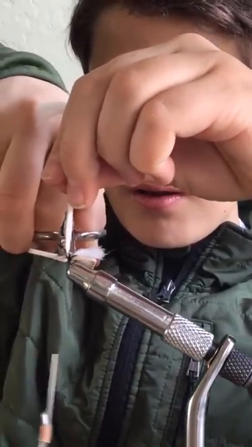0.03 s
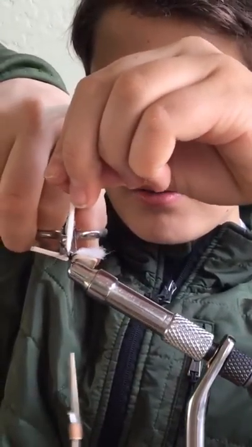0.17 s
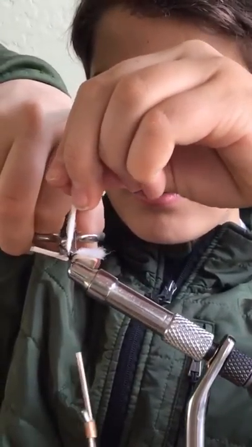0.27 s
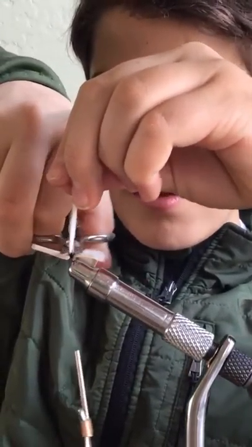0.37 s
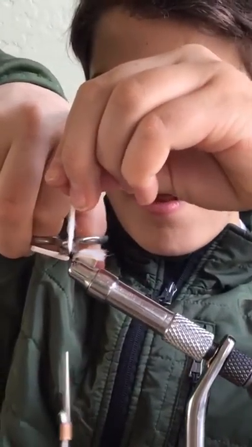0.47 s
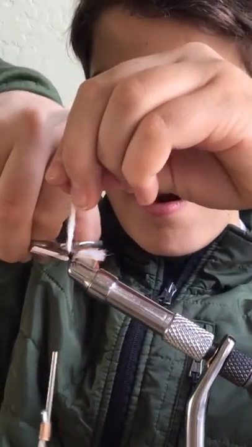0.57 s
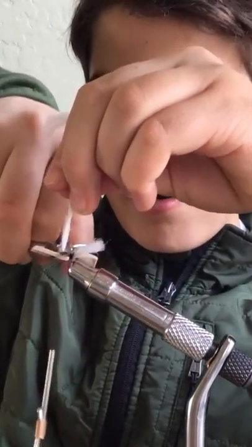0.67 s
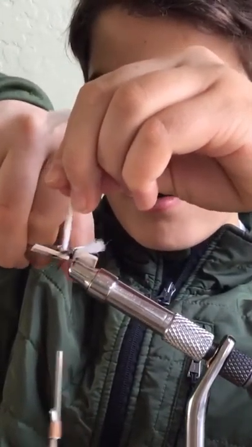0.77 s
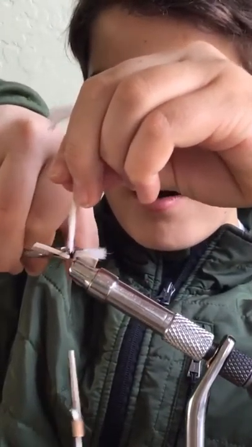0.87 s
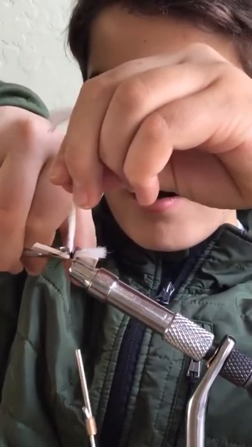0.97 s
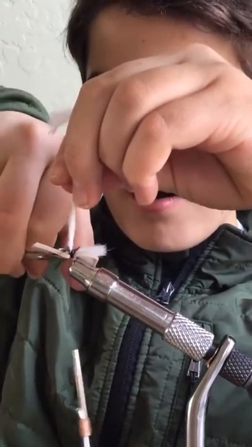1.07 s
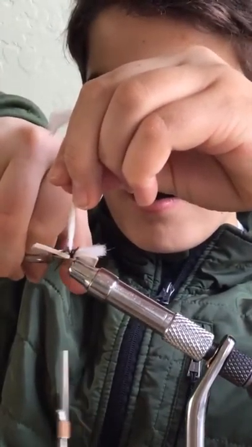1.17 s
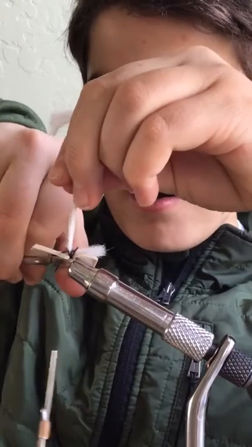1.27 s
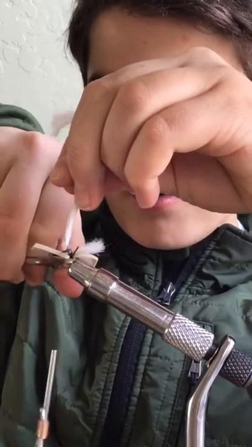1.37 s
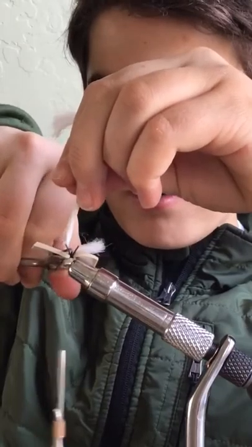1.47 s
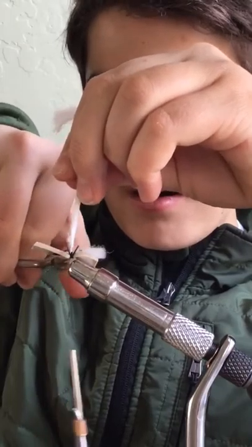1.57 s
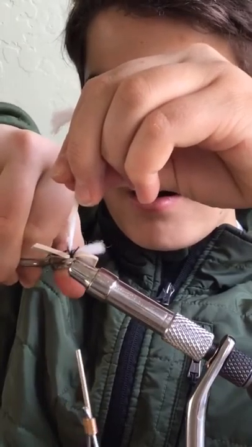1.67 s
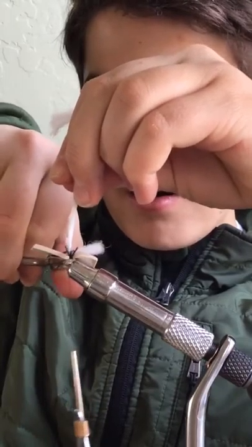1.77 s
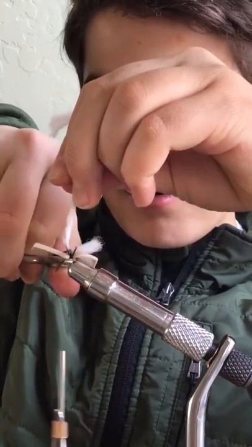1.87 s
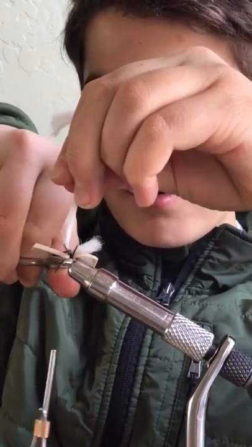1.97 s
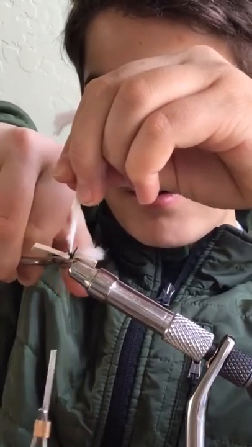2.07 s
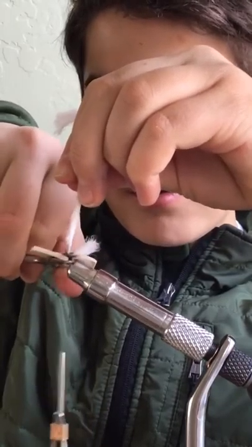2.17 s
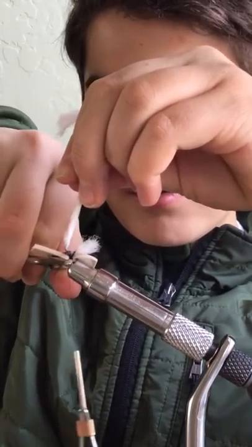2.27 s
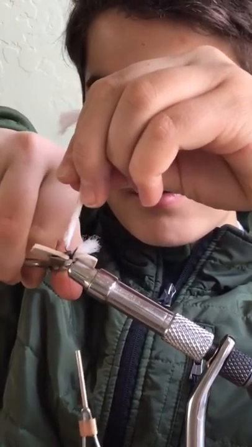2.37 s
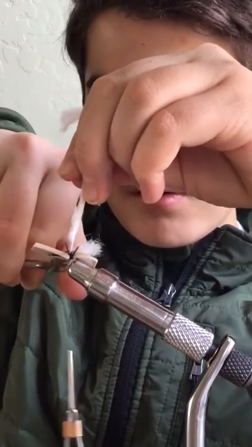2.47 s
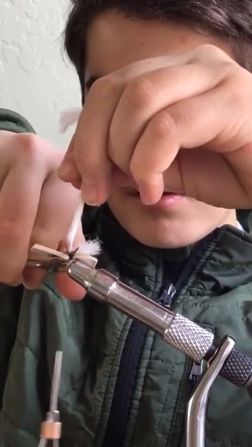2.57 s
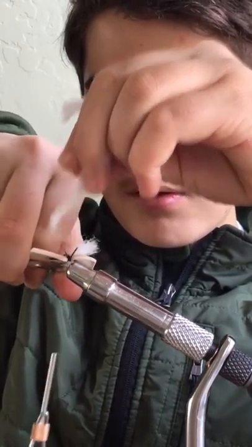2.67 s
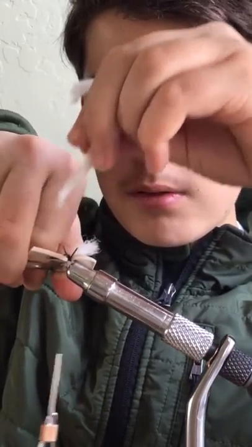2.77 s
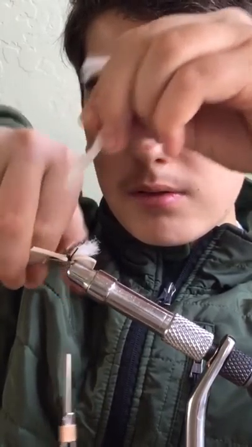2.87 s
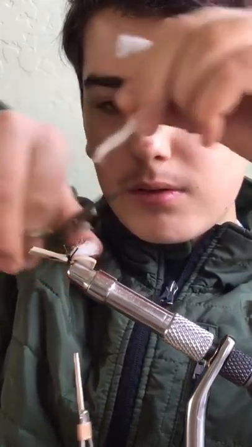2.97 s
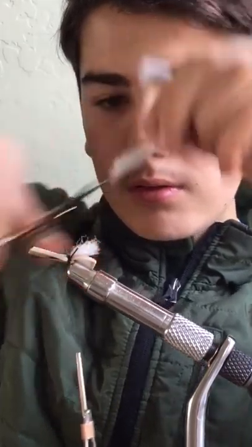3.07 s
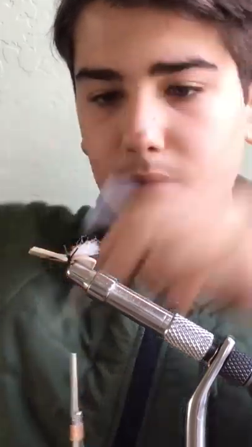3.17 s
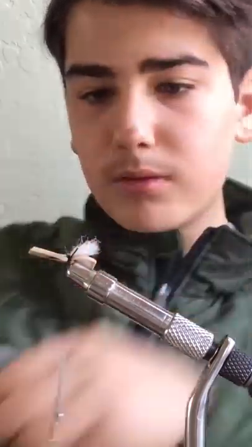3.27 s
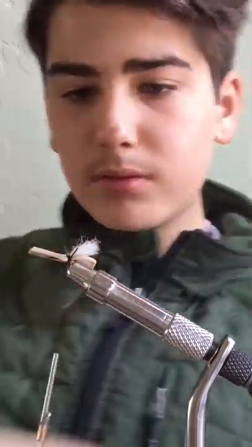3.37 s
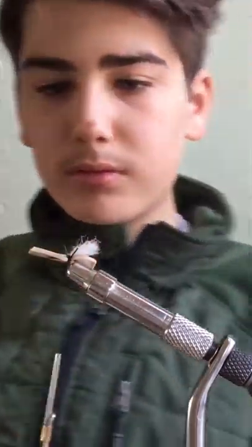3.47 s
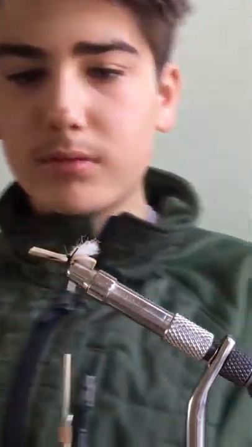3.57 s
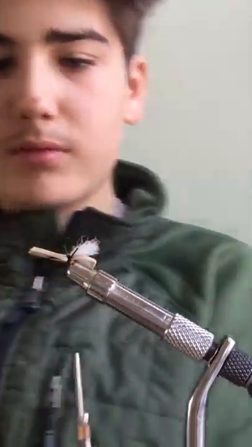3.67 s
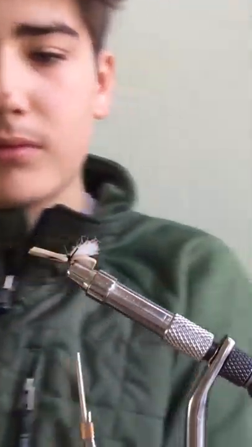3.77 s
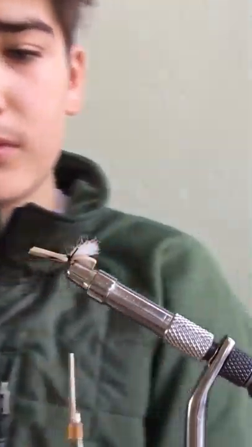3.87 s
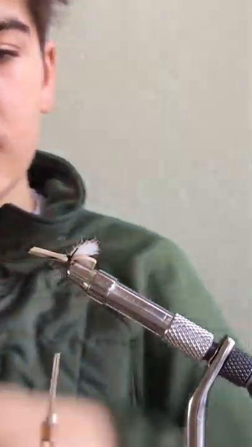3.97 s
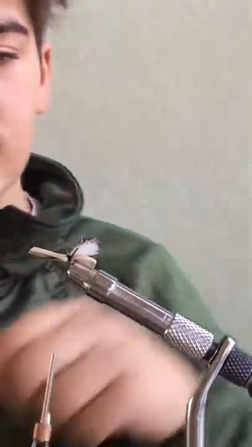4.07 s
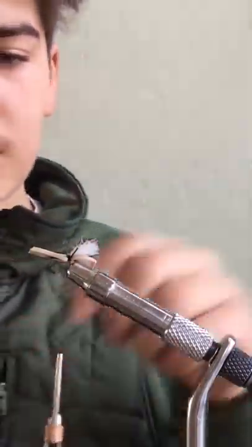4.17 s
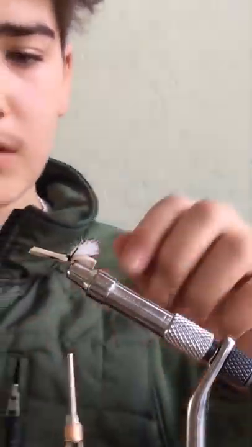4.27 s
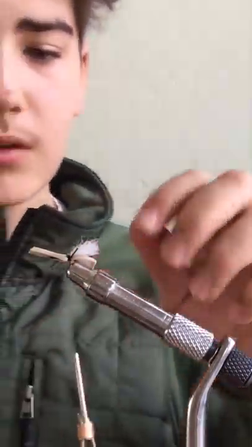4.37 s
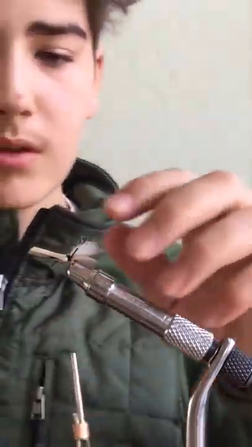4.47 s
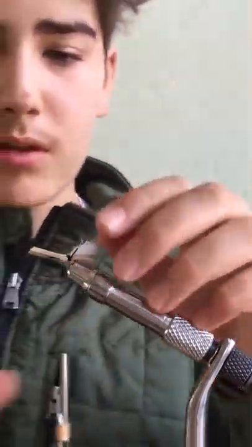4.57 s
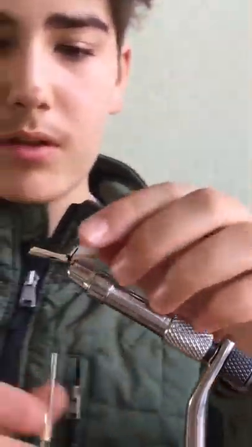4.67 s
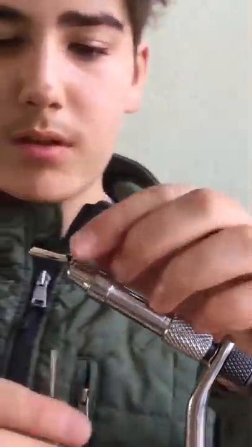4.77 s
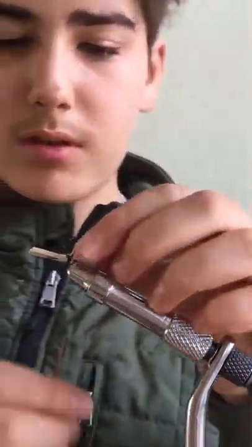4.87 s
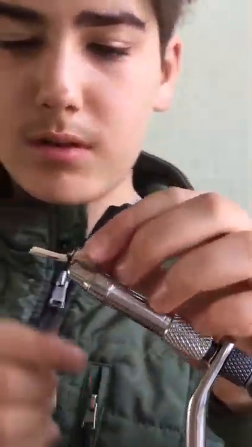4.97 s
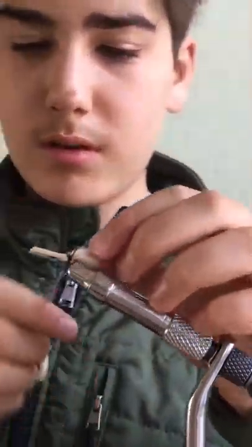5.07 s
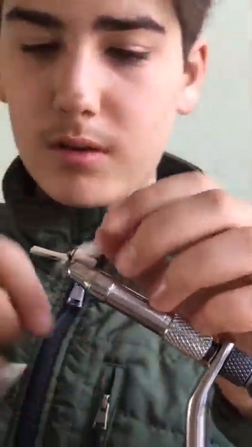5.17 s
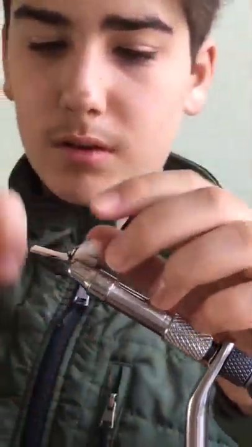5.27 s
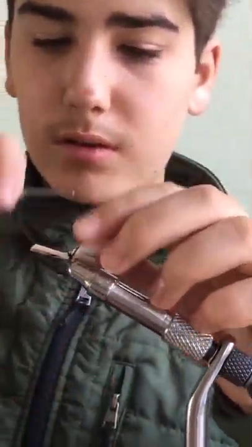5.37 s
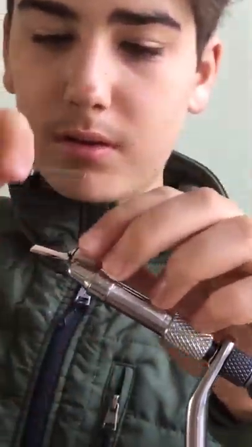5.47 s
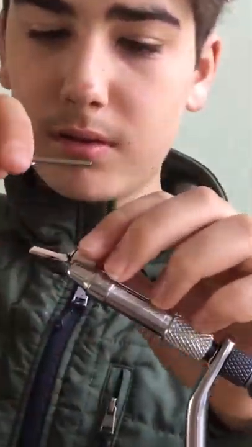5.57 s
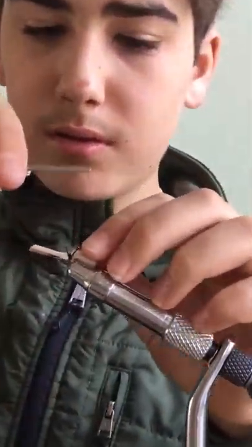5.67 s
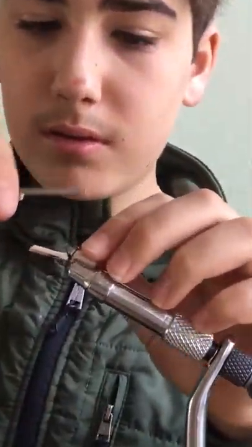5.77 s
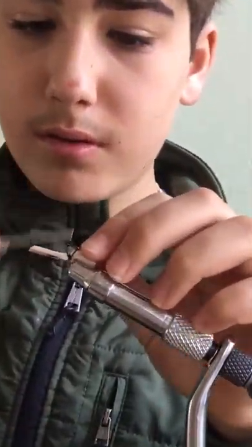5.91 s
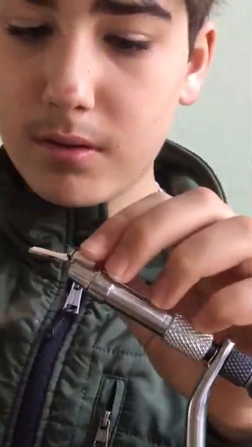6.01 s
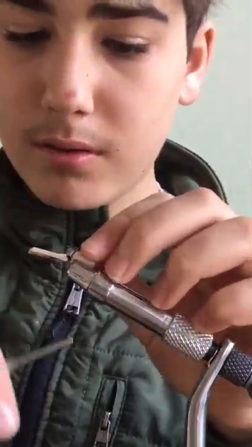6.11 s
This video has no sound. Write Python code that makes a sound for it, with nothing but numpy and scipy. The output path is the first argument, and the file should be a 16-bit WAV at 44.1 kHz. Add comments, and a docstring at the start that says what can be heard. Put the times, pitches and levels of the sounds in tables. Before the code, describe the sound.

Close up in a small quiet room, fine scissors tick, rub and snip four times through fibres, while tugs on a small vise give soft dull thuds with a low room boom. After a sharp final cut, a hand bumps the table, the scissors knock loudly and clatter with a short scrape, nylon sleeves brush, and only low room tone remains.

```python
"""Steel scissors snip and tick at a fly-tying vise; then they knock, slide and clatter on the table top.
Blades and rubs are short bursts of coloured micro-impacts; fibres crunch as random grains.
Each tug rings the modes of the vise, and the small room answers with a low boom a moment later.
Knocks ring wood, room and loose steel; jacket sleeves brush as swelling grains over a low room tone.
All is heard close up by a phone in a small room, with the table wetter than the scissors and vise."""
import sys
import numpy as np
from scipy import signal
from scipy.fft import rfft, irfft
from scipy.io import wavfile

SR = 44100
rng = np.random.default_rng(int(sys.argv[2]) if len(sys.argv) > 2 else 0)


def waveform_to_disk(signal):
    """Save audio, clipped to [-1, 1], as 16-bit WAV at the path in sys.argv[1]."""
    frames = np.transpose(np.atleast_2d(signal))
    scaled = np.clip(frames, -1, 1) * 32767
    samples = np.round(scaled).astype(np.int16)
    wavfile.write(sys.argv[1], SR, samples)


N = 270857
TIME = np.arange(N) / SR  # s, whole scene
AGE = TIME[:SR * 3 // 4]  # s, one response


def undb(db):
    """Decibels to gain."""
    return 10 ** (np.asarray(db) / 20)


def fade(t60):
    """Exponential decay that falls 60 dB in t60 seconds."""
    return np.exp(-np.log(1000) * AGE / t60)


def swell(s, attack, hold, release):
    """Envelope that climbs 60 dB in the attack to reach 1 at time s, holds, and falls 60 dB in the release."""
    before = np.maximum(s - TIME, 0) / attack
    after = np.maximum(TIME - s - hold, 0) / release
    return np.exp(-np.log(1000) * np.minimum(before + after, 10))


def unit(x):
    """Scale a response to unit energy."""
    return x / np.sqrt(np.sum(x ** 2))


def through(x, response):
    """Pass a sound through a response."""
    return signal.fftconvolve(x, response)[:len(x)]


def add(out, s, x):
    """Mix x in at time s."""
    i = int(max(s, 0) * SR)
    out[i:i + len(x)] += x[:N - i]


def colour(points, tilt_db=0, size=4096):
    """Causal response with the given spectrum and tilt per octave, from the cepstrum of its log gain."""
    hz, db = np.transpose(points)
    octave = np.log2(np.maximum(np.arange(size // 2 + 1) * SR / size, 1))
    gain_db = np.interp(octave, np.log2(hz), db) + tilt_db * octave
    cepstrum = irfft(np.log(undb(gain_db)))
    # keeping only the positive times makes the response causal
    cepstrum[0], cepstrum[size // 2:] = 0, 0
    return unit(irfft(np.exp(2 * rfft(cepstrum[:size]))))


def ring(modes):
    """Sum of decaying sine modes, each given as Hz, dB and t60 in seconds."""
    return sum(undb(db) * fade(t60) * np.sin(2 * np.pi * hz * AGE) for hz, db, t60 in modes)


def contact(t60, rise=0.0023):
    """A quickly dying chatter of micro-impacts: random signs under a short rise and a decay."""
    return rng.choice([-1, 1], len(AGE)) * fade(t60) * (1 - fade(rise))


def grains(rate, spread_db):
    """Random tiny slips of very unequal size, rate per second, rms 1."""
    happens = rng.random(N) < rate / SR
    sign = rng.choice([-1, 1], N)
    size = undb(spread_db * np.minimum(rng.exponential(size=N), np.pi))
    slips = happens * sign * size
    return slips / slips.std()


def room_tone(level_db=-66.5, waver_db=5.5):
    """Low background of the house: steady coloured noise and a drone of two standing waves that wavers."""
    # Spectrum of the steady rumble. Each row: frequency in Hz, density in dB per Hz.
    rumble_colour = [(25, -23), (60, 1.5), (100, -2.5), (128, 0), (185, -5), (250, -1.5), (320, -10),
                     (550, -21.5), (1250, -34.5), (2000, -33), (2800, -35), (4800, -35), (9000, -39.5),
                     (16000, -44)]
    waver = signal.resample(rng.standard_normal(60), N)
    rumble = through(rng.standard_normal(N), colour(rumble_colour))
    drone = through(rng.standard_normal(N), unit(ring([(136.5, 0.0, 0.5), (246.0, 0, 0.067)])))
    return undb(level_db) * (rumble + undb(-11.5 + waver_db * waver) * drone)


def room(x, near_db, tail_db):
    """Scatter from near things, a flutter between the walls and a short, duller tail."""
    # Sound bounces between two walls. Each row: delay in seconds, level in dB.
    echoes = [(0.0364, -28), (0.0445, -29), (.081, -43.5), (.085, -36.5)]
    near, tail = rng.standard_normal((2, len(AGE))) * (1 - fade(0.027))
    near_colour = colour([(150, -15.5), (500, 3.0), (16000, 5)])
    tail_colour = colour([(120, 6.5), (400, 4), (4000, -4.5), (8000, -7.5), (16000, -22.0)])
    near = unit(through(near * fade(0.074), near_colour))
    tail = unit(through(tail * fade(0.23), tail_colour))
    wet = through(x, undb(near_db) * near + undb(tail_db) * tail)
    # furniture smears and dulls each wall echo
    wall_colour = colour([(100, -6.0), (4000, -2), (8000, -7), (16000, -17.0)])
    wall = unit(through(contact(t60=0.034), wall_colour))
    bounce = through(x, wall)
    for s, db in echoes:
        add(wet, s, undb(db) * bounce)
    return x + wet


def jacket():
    """Nylon sleeves brush in fine grains, swelling and dying away with the speed of the arm; some strokes hiss."""
    # A sleeve brushes with each move of an arm; the row at 3.67 s is instead the rattle after the hand bumps
    # the table. # Each row: fastest moment in seconds, level in dB, time to swell or die away in seconds, #
    # fine hiss in dB relative to the stroke.
    strokes = [(3.1, -82, 0.08, -8), (3.351, -69.5, 0.091, -10), (3.67, -66, 0.069, -25),
               (3.86, -63, 0.044, -23), (4.3, -66, 0.16, -25), (4.54, -66.5, .07, -20),
               (5.07, -75.5, .12, -8.5), (5.65, -80.5, 0.12, -15)]
    # Spectra of the cloth and of its fine hiss. Each row: frequency in Hz, density in dB per Hz.
    cloth_colour = [(100, -11), (350, 6), (700, 6), (1200, -4.5), (2000, 1), (3200, -6), (5000, -7),
                    (7000, -18), (15000, -33)]
    hiss_colour = [(2000, -12.5), (5000, -0.5), (8000, -2.5), (16000, -13)]
    fibres = grains(rate=45000, spread_db=3.0)
    body, hiss = 0, 0
    for s, db, swell_s, hiss_db in strokes:
        speed = undb(db) / np.cosh(np.clip((TIME - s) / swell_s, -20, 20))
        # overlapping strokes add in power
        body = np.hypot(body, speed)
        hiss = np.hypot(hiss, undb(hiss_db) * speed)
    return through(body * fibres, colour(cloth_colour)) + through(hiss * fibres, colour(hiss_colour))


def table(knock_ring_db=-7, slide_steel_db=-19):
    """Bumps thud on the table top; knocks and a stick-slip slide also ring wood, room and the loose blades."""
    # Resonances heard with a knock, of wood and room together, and of the blades.
    # Each row: frequency in Hz, level in dB, t60 in seconds.
    knock_modes = [(128, -5, .35), (251, -5, .22), (360, -7, .18), (440, -8, .18), (635, 0, .22),
                   (692, 0, .22), (746, -2, .16), (801, 0, .15), (837, 8, .19), (1500, -3, .12),
                   (1725, -3, .15), (1800, -1, .12), (1942, -2, .15), (2077, -1, .15), (2167, -2, .15),
                   (2276, 0, .14), (2715, -4, .11), (3020, 2, .11), (3275, -4, .11)]
    steel_modes = [(11767, 0, .09), (11885, -3, .02), (12584, 0, .02), (12694, 2, .055), (15337, -2, .04),
                   (15680, -2, .04)]
    # The scissors clatter down. Each row: start in seconds, level in dB, t60 of the contact in seconds,
    # steel ring in dB, treble tilt in dB per octave.
    knocks = [(3.8957, -32.5, 0.067, -16.5, -1), (3.9204, -23, 0.047, -25, 0.2),
              (3.945, -32.5, 0.03, -15.5, 3), (4.097, -12.5, 0.035, -15.5, -1),
              (4.137, -24.5, 0.07, -24, -2.5), (4.153, -23, 0.044, -31.5, 2.5),
              (4.186, -33.5, 0.027, -33, 1)]
    # A hand bumps the table. Each row: start in seconds, level in dB, t60 of the contact in seconds.
    bumps = [(3.5932, -32.5, 0.052), (3.609, -37, 0.02), (3.627, -37, 0.039), (3.653, -51.5, 0.1),
             (3.677, -50, 0.19), (4.34, -54.5, 0.093)]
    # Steel slides over the table between knocks. Each row: start in seconds, length in seconds, level in dB.
    slides = [(3.911, .18, -48.5), (4.125, 0.044, -39.5)]
    # Spectra of knocks and bumps. Each row: frequency in Hz, density in dB per Hz.
    knock_colour = [(30, -60), (80, -37), (150, -12), (520, -14), (650, 0), (830, 4.5), (1060, -9.5),
                    (1500, -1), (2100, 0.5), (3100, -7), (4500, -10.5), (6500, -25.5), (10000, -32.5),
                    (16000, -35)]
    bump_colour = [(50, -1.5), (150, 4.5), (380, 7), (700, 6), (1100, -15), (1700, 1), (2600, 4),
                   (3200, -3), (4200, -5.5), (6000, -21), (10000, -29), (16000, -52)]
    slide_attack_s, slide_release_s = 0.035, 0.14

    knock_ring = undb(knock_ring_db) * unit(ring(knock_modes))
    steel = unit(ring(steel_modes))
    drag = sum(undb(db) * swell(s, slide_attack_s, length, slide_release_s) for s, length, db in slides)
    slips = drag * grains(rate=900, spread_db=3.5)
    scrape = through(slips, colour(knock_colour, tilt_db=0.07))
    out = scrape + through(slips, undb(-1) * knock_ring + undb(slide_steel_db) * steel)
    for s, db, t60 in bumps:
        add(out, s, undb(db) * through(contact(t60, rise=0.00061), colour(bump_colour)))
    for s, db, t60, steel_db, tilt_db in knocks:
        blow = undb(db) * contact(t60, rise=0.0067)
        clack = through(blow, colour(knock_colour, tilt_db))
        add(out, s, clack + through(blow, knock_ring + undb(steel_db) * steel))
    return out


def vise():
    """A soft push rings mostly the low modes; the small room answers with a low boom a moment later."""
    # The vise is tugged and springs back. Each row: start in seconds, level in dB,
    # sharpness of the push in Hz, low boom of the room in dB.
    tugs = [(.07, -55, 110, -51.5), (.386, -47, 800, -56), (0.393, -35, 148, -56), (0.479, -51, 200, -58),
            (0.516, -57.5, 700, -53), (.654, -38, 250, -33), (.876, -41.5, 70, -39),
            (1.387, -46.5, 443, -48), (1.586, -50.5, 110, -42.5), (1.837, -41.5, 245, -42),
            (2.074, -54, 400, -42.5), (2.165, -45.5, 696, -33.5), (2.267, -39, 317, -33.5),
            (2.505, -54, 131, -49), (2.7114, -27.5, 3020, -31), (3.828, -40.5, 150, -42.5)]
    # Modes of the vise on its stand. Each row: frequency in Hz, level in dB, t60 in seconds.
    vise_modes = [(82, -18.5, 0.32), (129.8, -5.5, 0.37), (170, -0.5, 0.12), (185.2, -15, 0.4),
                  (258, -8.5, 0.15), (361, -0.5, 0.061), (440.6, -3, 0.04), (832, 0, 0.04),
                  (903, 3.5, 0.028), (1032, -5, 0.047), (1093, -12, 0.024), (1284, -7, 0.033),
                  (1605, -6, 0.035), (2020, -3.5, 0.03), (2554, -8.5, 0.033)]
    # the boom is the same for every tug but for its level
    boom_hz, boom_t60_s, boom_delay_s, boom_rise_s = 127.3, 0.15, 0.025, 0.037

    out = np.zeros(N)
    boom = ring([(boom_hz, 0, boom_t60_s)]) * (1 - fade(boom_rise_s))
    for s, db, push_hz, boom_db in tugs:
        # modes above the sharpness of the push are driven less
        modes = [(hz, mode_db - 10 * np.log10(1 + (hz / push_hz) ** 2), t60)
                 for hz, mode_db, t60 in vise_modes]
        add(out, s, undb(db) * ring(modes) * (1 - fade(0.014)))
        add(out, s + boom_delay_s, undb(boom_db) * boom)
    return out


def scissors():
    """Held blades are damped by the fingers: dry clicks, rubs and the crunch of fibres."""
    # Blades shear through fibres, ever louder until they meet. Each row: meeting in seconds,
    # level in dB, build-up in seconds.
    cuts = [(0.647, -68.5, 0.26), (1.382, -62.5, 0.092), (2.703, -45, 0.025)]
    # Blades snap shut. Each row: start in seconds, level in dB, treble tilt in dB per octave.
    snips = [(1.3836, -27, -0.2), (1.8338, -29.5, 2.6), (2.2649, -27, 1.2), (2.7039, -25.5, 2.6)]
    # Blades part or touch lightly. Each row: start in seconds, level in dB,
    # pitch of the brightest ring in Hz, level of that ring in dB relative to the tick.
    ticks = [(0.53, -73, 10500, 5), (0.5706, -67, 14000, -1), (0.646, -48.5, 8300, -7),
             (0.656, -52, 15500, -18), (0.871, -49.5, 5830, -12), (1.5754, -59.5, 11900, 16.5),
             (2.061, -61, 12900, 12.5), (2.495, -65.5, 12500, 5), (5.2372, -65.5, 5100, 1.5)]
    # The pivot and finger rings rub. Each row: start in seconds, level in dB, t60 in seconds.
    rubs = [(0.4165, -60, 0.02), (.478, -64.5, 0.08), (1.576, -69, 0.14), (1.662, -76, 0.16),
            (2.062, -63.5, 0.11), (2.145, -58.5, 0.059), (2.497, -58.5, 0.015), (2.928, -71, 0.049)]
    # Spectra of snips, of ticks and fibres, and of rubs. Each row: frequency in Hz, density in dB per Hz.
    snip_colour = [(300, -10.5), (1300, -18.5), (2200, 4), (3000, -5.5), (4100, 5.5), (5000, -9), (5900, 2),
                   (6900, -13), (8300, -6), (10000, -14.5), (12500, -12.5), (14900, -3.5), (16000, -7.5)]
    tick_colour = [(500, -11), (2000, -1.5), (3000, -11), (5000, 1.5), (6800, -17), (8500, 9),
                   (10300, -2.5), (12500, 0), (16000, 1)]
    rub_colour = [(400, -6), (1400, -10), (1950, 9), (2900, -21.5), (4200, -1.5), (6000, -17),
                  (15000, -28.5)]

    pressure = sum(undb(db) * swell(s, build_up, 0, release=0.05) for s, db, build_up in cuts)
    out = pressure * through(grains(rate=4900, spread_db=19), colour(tick_colour))
    for s, db, tilt_db in snips:
        snap = contact(t60=0.0083, rise=0.00007)
        add(out, s, undb(db) * through(snap, colour(snip_colour, tilt_db)))
    for s, db, hz, ring_db in ticks:
        touch = contact(t60=0.02)
        add(out, s, undb(db) * through(touch, colour(tick_colour)))
        add(out, s, undb(db + ring_db) * through(touch, unit(ring([(hz, 0, .003)]))))
    for s, db, t60 in rubs:
        add(out, s, undb(db) * through(contact(t60), colour(rub_colour)))
    return out


def scene():
    """Scissors and vise are close; the table is further off and wetter; jacket and room tone stay dry."""
    close = room(scissors() + vise(), near_db=-11.5, tail_db=-18.5)
    far = room(table(), near_db=-9.0, tail_db=-11.0)
    return (close + far + jacket() + room_tone())[None]


def record(dry, low_cut_hz=50, top_hz=15900):
    """The phone thins the deep bass and cuts the top steeply."""
    low_cut = signal.butter(3, low_cut_hz, "high", fs=SR, output="sos")
    top_cut = signal.ellip(8, .2, 70, top_hz, fs=SR, output="sos")
    thin = signal.sosfilt(low_cut, dry)
    return signal.sosfilt(top_cut, thin)


dry = scene()
out = record(dry)
waveform_to_disk(out)
```